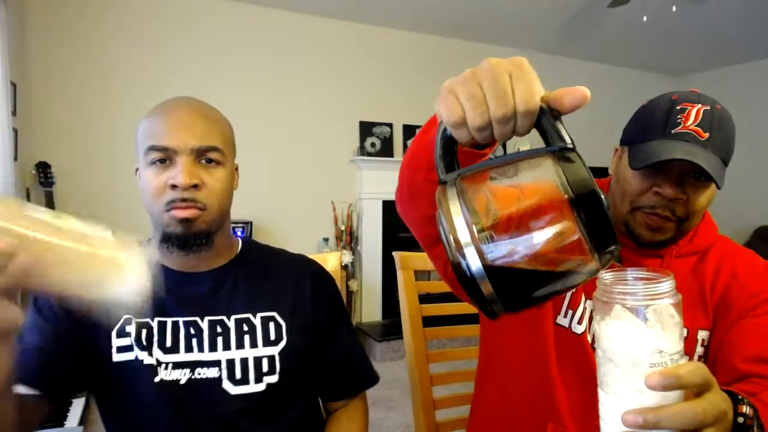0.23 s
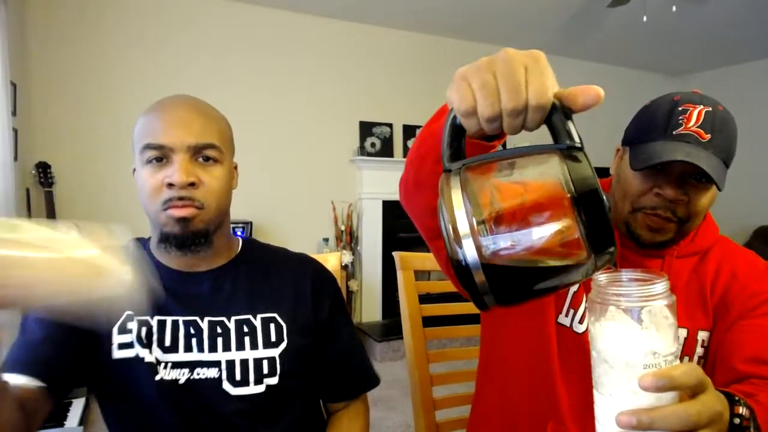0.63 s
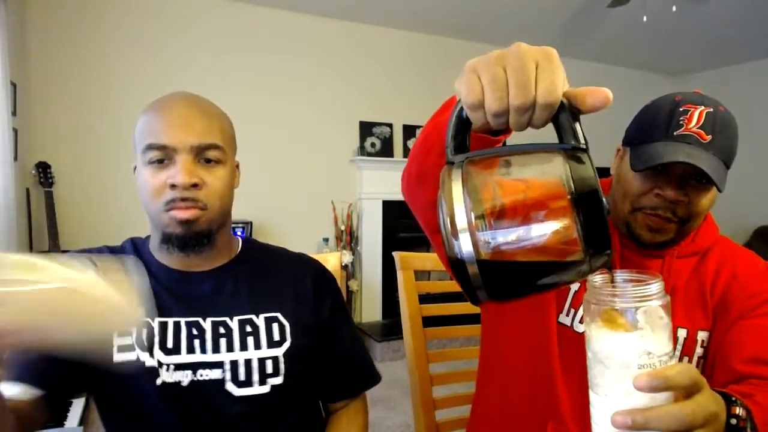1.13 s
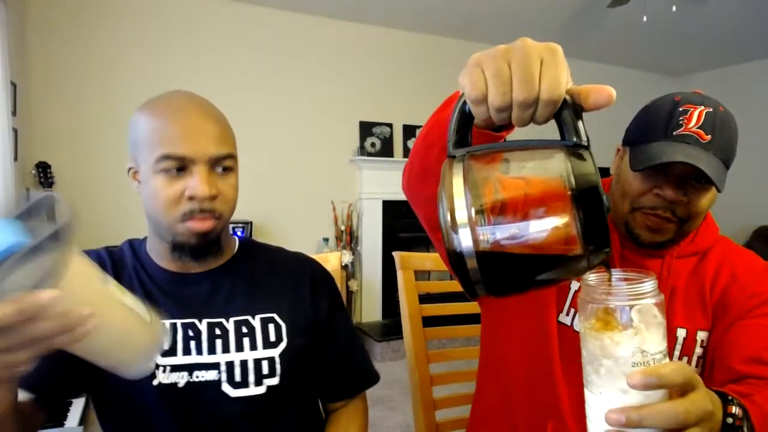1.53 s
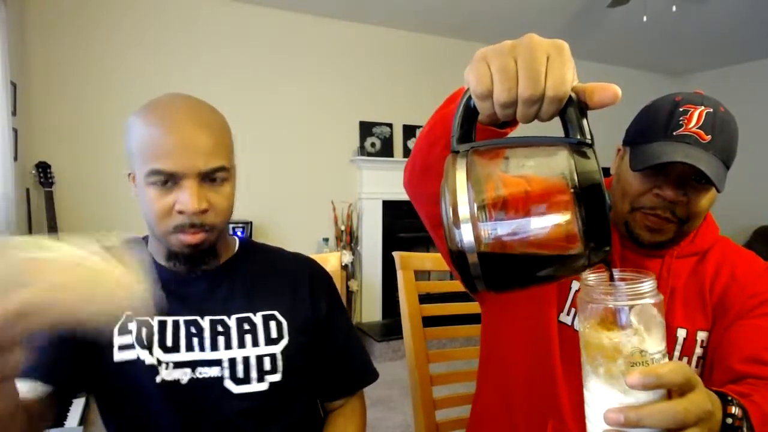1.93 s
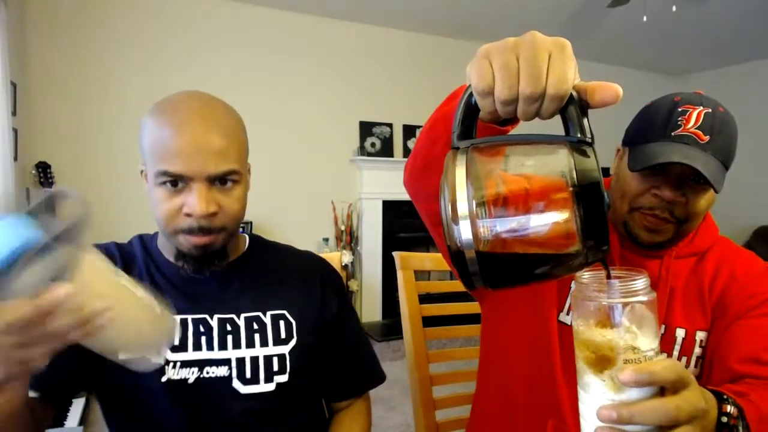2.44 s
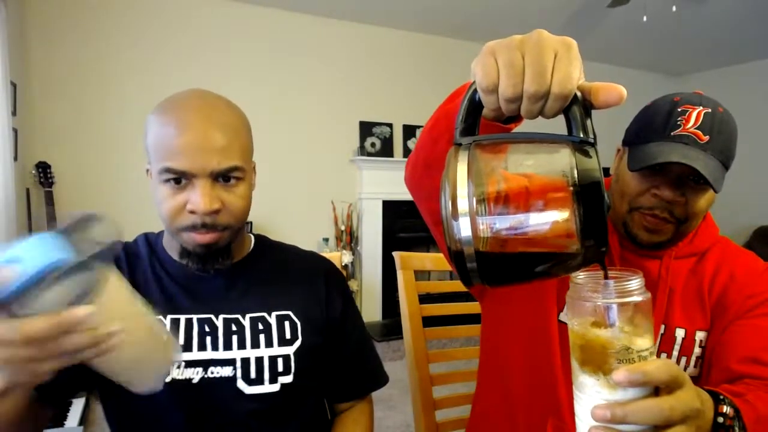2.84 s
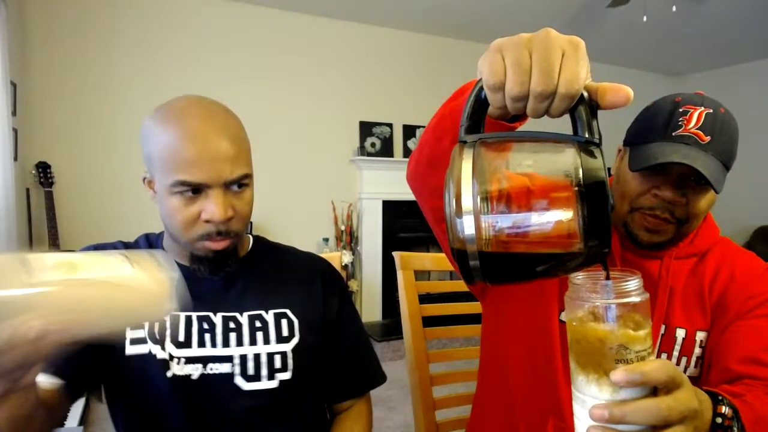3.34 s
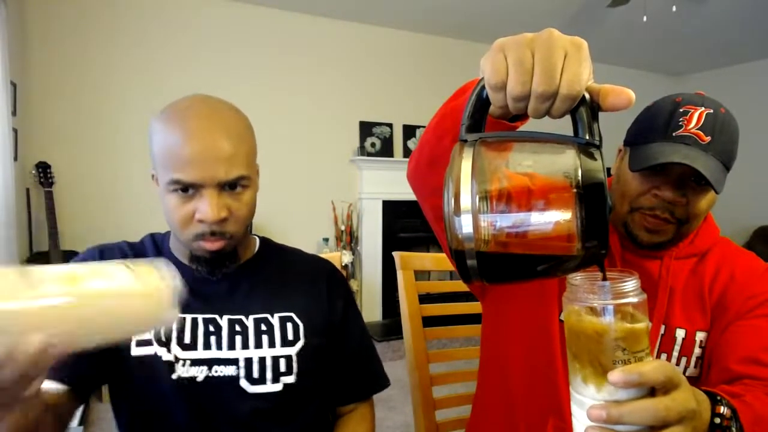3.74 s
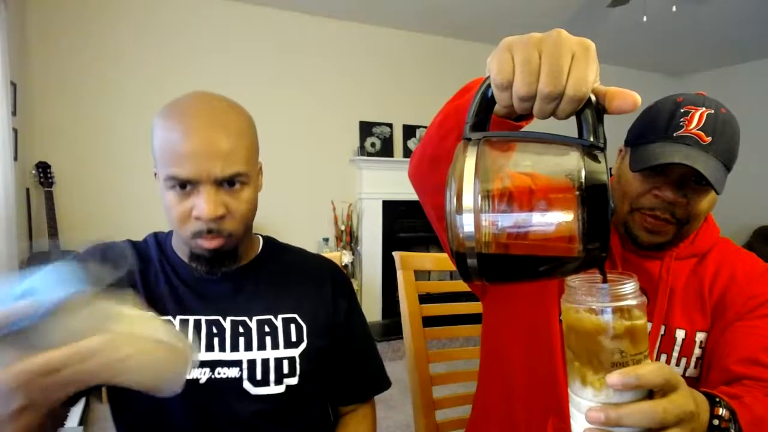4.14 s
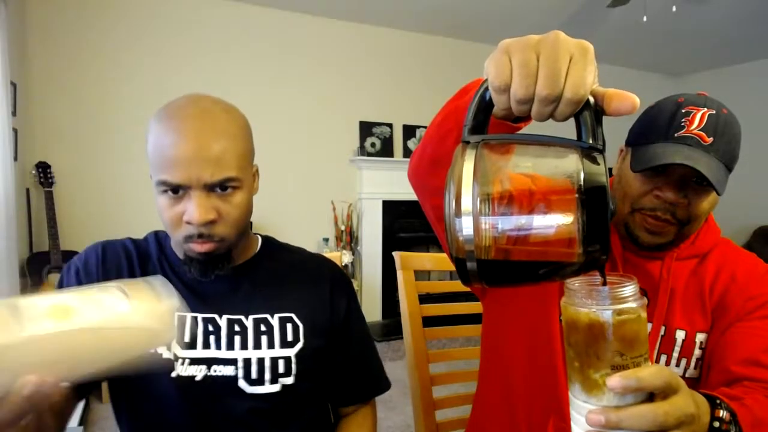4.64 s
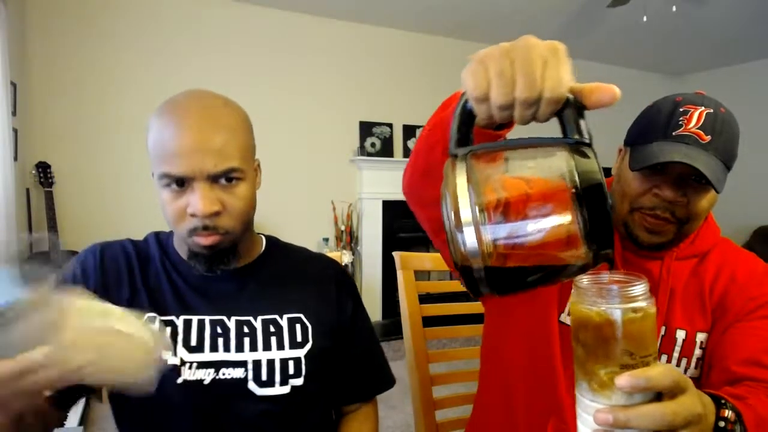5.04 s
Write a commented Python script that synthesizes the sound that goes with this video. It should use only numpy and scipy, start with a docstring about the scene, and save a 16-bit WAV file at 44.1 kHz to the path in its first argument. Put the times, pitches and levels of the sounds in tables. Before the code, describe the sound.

In a carpeted living room, an iced drink swings in a plastic shaker close to the microphones and slightly left. Dense ice rattles, hollow knocks, gurgles and spray start at once, strongest in the first second, then become lighter and more separated. Within the first second a thin coffee trickle over ice in a glass jar fades in farther off, with bubbly tones, soft crackle, sharp snaps and small gulps of air. A faint low hum lies underneath.

```python
"""A carpeted living room, two close-set microphones: a faint low hum, with two soft bumps, lies under it all.
From the start an iced drink is swung in a plastic shaker bottle, close by and to the left: grains and bubbles
rung through the bottle's modes slosh, gurgle and spray, and struck modes give the knocks of ice cubes. Within
the first second a thin trickle of coffee over ice in a glass jar fades up further off, as rising bubble tones
and soft crackle. Towards its end, sharp snaps of ice and gulps of air begin and go on among the swings."""
import sys
import numpy as np
from scipy import signal
from scipy.fft import rfft, irfft
from scipy.io import wavfile
from scipy.ndimage import uniform_filter1d

SR = 44100
rng = np.random.default_rng(int(sys.argv[2]) if len(sys.argv) > 2 else 0)


def transcribe(u):
    """Save the signal u as a 16-bit wav file named by the first command-line argument.

    u: samples, shape (n,) or (channels, n), limited to [-1, 1]; the rate is SR.
    q: integer samples, one column per channel.
    """
    v = np.clip(np.atleast_2d(u).T, -1, 1)
    q = np.round(v * 32767).astype(np.int16)
    wavfile.write(sys.argv[1], SR, q)


N = 233097
TIME = np.arange(N) / SR

# resonances of the bottle's base, air space and wall: f/Hz, relative level/dB, t60/s (before any damping by a cube)
BASE_MODES = [(367, -13, 0.11), (413.5, -8, 0.13), (515, 0.5, 0.058), (611, 2, 0.12)]
CAVITY_MODES = [(824, -8.5, 0.0067), (910, 0, 0.029), (1068, -3.5, 0.03), (1420, -19.5, 0.039)]
WALL_MODES = [(1554, -4.5, 0.022), (1802, -1.5, 0.036), (1980, 2, 0.018), (2225, -2, 0.074),
              (2580, 14, 0.0044), (2660, -32, 0.011), (3070, -6, 0.058), (3470, 0.5, 0.012),
              (4240, 4, 0.0053)]
# spectrum of a hard ice contact: f/Hz, relative level/dB
TICK_COLOUR = [(1500, -36.5), (3000, 6.5), (4000, 2), (5300, 0.5), (6900, -0.5), (7600, -8.5), (9800, -9),
               (12000, -15.5), (16000, -40)]
# spectrum of fine splashes and of crackling ice: f/Hz, relative level/dB
SPRAY_COLOUR = [(1500, -31), (3000, 2), (4000, 1), (5300, -4.5), (6800, -10), (10000, -10.5), (13000, -19),
                (16000, -52)]

# the wall's two singing resonances; where the drink lies decides which one leads
UPPER_HZ, LOWER_HZ = 2486, 1927
CHATTER_S = 0.006  # decay of a cube's chatter on the wall, and of the crumbling of a tick


def undb(db):
    """Decibels to gain."""
    return 10 ** (np.asarray(db) / 20)


def unit(x):
    """Scale to rms 1."""
    return x / np.sqrt(np.mean(x ** 2) + 1e-18)


def curves(table):
    """The columns of a table, joined by straight lines in time."""
    s, *columns = np.transpose(table)
    return [np.interp(TIME, s, c) for c in columns]


def add(track, s, sound):
    """Mix a sound into a track at time s, or at the start if s is negative."""
    i = max(int(s * SR), 0)
    part = sound[:max(N - i, 0)]
    track[i:i + len(part)] += part


def through(x, response):
    """Pass a signal through an impulse response."""
    return signal.fftconvolve(x, response)[:len(x)]


def lowpass(x, hz, order):
    """Butterworth filter that keeps what lies below hz."""
    return signal.sosfilt(signal.butter(order, hz, fs=SR, output="sos"), x)


def highpass(x, hz, order):
    """Butterworth filter that keeps what lies above hz."""
    return signal.sosfilt(signal.butter(order, hz, "high", fs=SR, output="sos"), x)


def bandpass(x, low_hz, high_hz, order):
    """Butterworth filter that keeps what lies between two frequencies."""
    return signal.sosfilt(signal.butter(order, [low_hz, high_hz], "band", fs=SR, output="sos"), x)


def band(low_hz, high_hz, order=3):
    """Impulse response of a broad band without single resonances."""
    return bandpass(signal.unit_impulse(1024), low_hz, high_hz, order)


def colour(points, size=512):
    """Causal (minimum-phase) impulse response with a spectrum of (Hz, dB) points."""
    hz, db = np.transpose(points)
    f = np.maximum(np.fft.rfftfreq(size, 1 / SR), 1)
    level_db = np.interp(np.log(f), np.log(hz), db)
    cepstrum = irfft(np.log(undb(level_db)))
    cepstrum[1:size // 2] *= 2
    cepstrum[size // 2 + 1:] = 0
    return irfft(np.exp(rfft(cepstrum)))


def clicks(rate, spread_db, size=N):
    """Random impulses, rate per second, many small and a few large."""
    chance, weight, sign = rng.random((3, size))
    gain = undb(spread_db * np.minimum(-np.log(weight + 1e-12), 3.5))
    return (chance < rate / SR) * gain * np.sign(sign - 0.5)


def steady(x):
    """Even out the slow level of a grain stream, leaving its grain."""
    window = int(0.04 * SR)
    power = uniform_filter1d(uniform_filter1d(x ** 2, window), window)
    return x / np.sqrt(np.abs(power) + 1e-3 * np.mean(x ** 2))


def flicker(rate):
    """Random levels, rate per second, joined by straight slews; spread near 1.3."""
    k = int(SR / rate)
    held = np.repeat(rng.standard_normal(N // k + 1), k)
    return 1.63 * uniform_filter1d(held, k)[:N]


def ring(modes, detune=0.025, spot_db=7.0, size=4096):
    """One blow's response: the liquid's load detunes the modes, the spot that is hit weights them."""
    hz, db, t60 = np.transpose(modes)[:, :, None]
    t = np.arange(size) / SR
    load, spot, polarity = rng.standard_normal((3, len(hz), 1))
    envelope = np.sign(polarity) * undb(db + spot_db * spot - 60 * t / t60)
    wave = (envelope * np.sin(2 * np.pi * hz * (1 + detune * load) * t)).sum(0)
    # the bottle radiates little outside the range of these modes
    return bandpass(wave, 0.87 * hz.min(), 1.07 * hz.max(), order=2)


def bubbles(rate, low_hz, high_hz, cycles, glide, spread_db):
    """Trapped air: short damped tones that rise as they near the surface."""
    out = np.zeros(N)
    for when, pitch, weight in rng.random((int(rate * N / SR), 3)):
        hz = low_hz * (high_hz / low_hz) ** pitch
        age = np.arange(int(cycles * SR / hz) + 2) * hz / (cycles * SR)  # 0 to 1 over the tone
        wave = undb(-50 * age) * np.sin(2 * np.pi * cycles * age * (1 + glide * age / 2))
        gain = undb(spread_db * min(-np.log(weight + 1e-12), 3.5))
        add(out, when * N / SR, gain * wave)
    return unit(out)


def crack(shape, decay_s, size=1024):
    """A tiny fracture or splash: a burst of a millisecond or so, each with its own colour."""
    t = np.arange(size) / SR
    return unit(through(rng.standard_normal(size) * t * np.exp(-t / decay_s), shape))


def room_tone():
    """Low hum of the room, shaped from noise, with a few soft sine bumps."""
    # spectrum of the still room: f/Hz, relative level/dB (per Hz)
    hum_colour = [(20, -13), (36, 2), (47, 1), (62, -1.5), (80, -37), (97, -1), (115, -14), (135, -2),
                  (170, -26), (300, -14), (600, -20.5), (2000, -16.5), (8000, -29), (16000, -44)]
    # soft low bumps in the room: t/s, length/s, f/Hz, rms level/dB
    bump_list = [(2.012, 0.14, 138, -61), (4.63, 0.31, 96.5, -64.5)]
    shape = colour(hum_colour, size=16384)
    mid, side = (unit(through(rng.standard_normal(N), shape)) for _ in range(2))
    out = undb(-61.0) * mid
    for s, length, hz, db in bump_list:
        t = np.arange(int(length * SR)) / SR
        swell = np.sin(np.pi * t / length)
        add(out, s, undb(db) * unit(swell * np.sin(2 * np.pi * hz * t)))
    return out + undb(-74) * np.array([side, -side])


def motion():
    """Sloshes on top of the swirl: gains of rattle, gurgle and spray, and the upper resonance's share."""
    # the drink swirling between sloshes: t/s, rattle level/dB, share of the upper wall resonance (0-1)
    swirl_curve = [(0, -41, 0), (0.85, -44, 0.05), (1.3, -44, 0.4), (1.6, -47.5, 0.2), (2.05, -47, 0.4),
                   (2.53, -50, 0.5), (2.8, -48, 0.6), (3.3, -45, 0.9), (3.6, -50.5, 0.43),
                   (4.45, -52, 0.36), (5.29, -51, 0.57)]
    # the drink thrown at the wall: t/s, length/s, ice rattle level/dB, gurgle level/dB, spray level/dB,
    # share of the upper wall resonance (0-1); levels are relative, before the mix
    slosh_list = [(-0.01, 0.049, -22, -36, -34, 0.42), (0.136, 0.056, -30, -50, -38, 1),
                  (0.245, 0.047, -43, -43, -46.5, 0), (0.389, 0.15, -27.5, -36, -34, 0.45),
                  (0.543, 0.2, -28.5, -37, -39, 0.33), (0.769, 0.098, -36.5, -48, -41, 1),
                  (0.894, 0.088, -38.5, -46.5, -55, 0), (1.013, 0.073, -29.5, -39.5, -48, 0.98),
                  (1.151, 0.044, -37, -64, -73, 0.1), (1.39, 0.1, -40.5, -41.5, -44, 0),
                  (1.661, 0.062, -41.5, -63, -47.5, 1), (1.763, 0.04, -40, -51, -44, 0.9),
                  (1.865, 0.067, -47, -39, -47.5, .4), (2.175, 0.058, -40.5, -38.5, -43, 0.8),
                  (2.271, 0.013, -41, -46, -43.5, 0.05), (2.411, 0.039, -44.5, -51, -48.5, 0.3),
                  (2.603, 0.045, -40, -66, -43.5, 1), (2.662, 0.034, -34.5, -47, -45, 0.9),
                  (2.72, 0.039, -31, -47, -42, 0.67), (2.85, 0.099, -49.5, -54, -44.5, 0.9),
                  (3.039, 0.069, -41.5, -42, -39, 0.45), (3.108, 0.095, -40.5, -56, -60, 0.22),
                  (3.188, 0.046, -63, -43, -43, .5), (3.421, 0.053, -44, -67, -64, 0.9),
                  (3.654, 0.022, -48, -34, -36.5, 0), (3.808, 0.03, -58, -74, -36, 0.9),
                  (3.901, 0.02, -42, -40, -39, 0.95), (3.924, 0.11, -47, -70, -49.5, 1),
                  (4.052, 0.035, -68, -65, -41.5, 0.4), (4.382, 0.045, -37.5, -68, -40, 0.98),
                  (4.56, 0.042, -38.5, -53, -41, 1), (4.882, 0.016, -42.5, -65, -41, 0.94),
                  (5.029, 0.048, -53, -44, -46.5, 0), (5.213, 0.028, -49, -47, -49, 0.8)]
    # each slosh swells, sags while it lasts and drains away
    attack_s, sag_db_per_s, drain_db_per_s = 0.0099, 8.5, 381
    gurgle_offset_db, spray_offset_db = -2, -5.5  # swirl's gurgle and spray relative to its rattle

    swirl_db, swirl_share = curves(swirl_curve)
    power = undb(swirl_db + np.array([[0], [gurgle_offset_db], [spray_offset_db]])) ** 2
    upper_power = swirl_share * power[0]
    for s, length, rattle_db, gurgle_db, spray_db, share in slosh_list:
        age = np.maximum(TIME - s, 0)
        fall_db = sag_db_per_s * age + drain_db_per_s * np.maximum(age - length, 0)
        envelope = np.minimum(age / attack_s, 1) * undb(-np.minimum(fall_db, 120))
        surge = np.outer(undb([rattle_db, gurgle_db, spray_db]), envelope) ** 2
        power = power + surge
        upper_power = upper_power + share * surge[0]
    return *np.sqrt(power), np.clip(upper_power / power[0], 0, 1)


def rattle(modes, rate, spread_db, count=24):
    """Small collisions at many spots of the bottle, each spot ringing the modes differently."""
    spots = (through(clicks(rate / count, spread_db), unit(ring(modes, detune=0.065))) for _ in range(count))
    return steady(sum(spots))


def singing_wall(hz, t60, wander, vigour):
    """Light touches keep one resonance of the wall ringing while the moving drink bends its pitch."""
    turn = np.exp(2j * np.pi * np.cumsum(hz * (1 + wander * flicker(25))) / SR)
    touches = clicks(220 * vigour, 3.6)
    # a decaying ring, computed in a frame that turns with the wandering pitch
    swing = signal.lfilter([1], [1, -undb(-60 / (t60 * SR))], touches / turn)
    return steady(bandpass((swing * turn).imag, 1300, 3600, order=2))


def gurgle_sound(vigour):
    """The air space and the base ring under many small blows, among low bubbles."""
    # the air space is strongest early on, the base gains on it later
    hollow_db = np.interp(TIME, [0.8, 3.3, 4.6], [2.0, 1.2, -1.5])
    air = undb(hollow_db - 0.5) * rattle(CAVITY_MODES, 170 * vigour, 1.8)
    base = undb(-hollow_db - 6.0) * rattle(BASE_MODES, 110 * vigour, 6.8)
    return air + base + undb(-4) * bubbles(90, 380, 1700, 10, 0.2, 4.5)


def wall_wash(upper, vigour):
    """Slivers of ice wash along the singing wall; hard churning buries its resonances under collisions."""
    # in the hardest slosh this share of the power is slivers of ice hitting each other
    churn_share = 0.42
    singing = np.sqrt(upper) * singing_wall(UPPER_HZ, 0.0068, 0.035, vigour)
    singing += np.sqrt(1 - upper) * singing_wall(LOWER_HZ, 0.02, 0.015, vigour)
    # the singing stands out and gives the wash its hollow colour
    wall = undb(-0.5) * singing + undb(-7) * rattle(WALL_MODES, 330 * vigour, 3.4)
    wall += undb(-7.5) * steady(bubbles(300, 1400, 3400, 13, 0.12, 4.0))
    churn = np.clip(churn_share * (vigour - 1) / (vigour.max() - 1), 0, 1)
    collisions = steady(through(clicks(4200, 3.2), band(1420, 6180, order=5)))
    return np.sqrt(1 - churn) * wall + np.sqrt(churn) * collisions


def spray_sound(vigour):
    """Fine splashes and fizzing bubbles; a hard slosh throws heavier drops, whose spray is duller."""
    heavy_spray_hz = 9200
    shape = colour(SPRAY_COLOUR)
    splashes = sum(through(clicks(12 * vigour ** 1.8, 5.2), crack(shape, 0.0002)) for _ in range(30))
    fizz = steady(bubbles(1100, 2900, 6800, 12, 0.08, 4.0))
    spray = undb(-0.5) * steady(splashes) + undb(-4) * fizz
    heavy = lowpass(spray, heavy_spray_hz, order=3)
    return spray / vigour + heavy * (1 - 1 / vigour)


def slosh(rattle_gain, gurgle_gain, spray_gain, upper):
    """The drink washes ice along the wall, gulps air and sprays; the harder it moves, the denser the grains."""
    vigour = np.clip(np.maximum(rattle_gain, 2 * spray_gain) / undb(-43.0), 1, 8)
    low = undb(-8.5) * gurgle_gain * gurgle_sound(vigour) + gulps()
    # a gentle wash arrives in clumps, a hard one is more even
    clumps_db = 2.0 * flicker(60) / np.sqrt(vigour)
    bright = rattle_gain * wall_wash(upper, vigour) + spray_gain * spray_sound(vigour)
    return low, undb(clumps_db) * bright


def blow(response, chatter, chatter_s, size=4096):
    """A first contact followed by dying chatter of the cube; rms 1 over the first 10 ms."""
    t = np.arange(size) / SR
    force = chatter * clicks(1500, 0.67, size=size) * np.exp(-t / chatter_s)
    force[0] = 1
    sound = through(force, response)
    return sound / np.sqrt(np.mean(sound[:SR // 100] ** 2))


def contact(size):
    """One clean touch: a very short burst that holds every frequency about equally."""
    contact_s = 0.00076
    burst = rng.standard_normal(size) * np.exp(-np.arange(size) / (SR * contact_s))
    # keep the burst's phases and level its spectrum
    even = irfft(np.exp(1j * np.angle(rfft(burst, 2 * size))))[:size]
    return even * np.sqrt(SR * contact_s / 2)


def crunch(shape, crumble, decay_s, size=4096):
    """Ice crushed at the contact: a sharp crack, then a dying spray of fractures; rms 1 over 10 ms."""
    t = np.arange(size) / SR
    fractures = unit(clicks(7000, 1.6, size=size)) * np.exp(-t / decay_s)
    sound = through(contact(size) + crumble * fractures, shape)
    return sound / np.sqrt(np.mean(sound[:SR // 100] ** 2))


def clink(hz, lead_db, t60=0.018, edge=0.63):
    """The wall struck by a cube: one resonance leads, and the drink muffles what lies below it."""
    wave = ring(WALL_MODES + [(hz, lead_db, t60)], detune=0.018, spot_db=1.5)
    return highpass(wave, edge * hz, order=3)


def knocks(upper):
    """Ice cubes strike base, air space and wall: returns the low body sound and the bright wall sound."""
    # cubes hitting the bottle: t/s, base thud level/dB, air space level/dB, wall ring level/dB,
    # contact tick level/dB; levels are relative, before the mix
    knock_list = [(0.0167, -35.5, -33, -20, -32), (0.026, -48, -46, -22.5, -36),
                  (0.0407, -42.5, -36, -39, -30), (0.1373, -61, -41, -27, -43.5),
                  (0.1432, -65, -38, -20, -51), (0.1847, -62, -57, -34, -39.5),
                  (0.302, -74, -50, -32.5, -56), (0.355, -69, -50, -29, -59),
                  (0.383, -39, -29.5, -16.5, -28.5), (0.3897, -69, -61, -21.5, -28),
                  (0.4002, -56, -60, -26, -31), (0.4766, -65, -32.5, -26.5, -32),
                  (0.586, -37.5, -42, -38, -32), (0.6005, -40, -41, -31, -35.5),
                  (0.6703, -38.5, -31, -29, -39), (0.733, -73, -62, -22.5, -32),
                  (0.763, -74, -39, -24.5, -34.5), (0.8387, -67, -46, -28.5, -38.5),
                  (0.9772, -71, -65, -29.5, -56), (1.016, -37.5, -47, -37, -49),
                  (1.0448, -41, -45, -31, -38), (1.058, -56, -34.5, -29.5, -40),
                  (1.206, -70, -64, -35.5, -68), (1.406, -48, -47, -34, -66), (1.442, -57, -39, -33, -54),
                  (1.4934, -61, -33, -37.5, -52), (1.7602, -33, -29.5, -26, -46.5),
                  (1.77, -50, -35, -28.5, -38.5), (1.9911, -78, -65, -20.5, -26.5),
                  (1.9954, -51, -56, -23, -36), (2.167, -33, -50, -49, -41.5),
                  (2.2138, -36, -26.5, -34, -31), (2.2228, -59, -50, -37, -61),
                  (2.3706, -46, -54, -41, -39.5), (2.713, -42, -35, -33, -40), (2.7202, -40, -40, -23, -27),
                  (2.7509, -37, -33, -28, -41), (2.833, -36, -42, -32.5, -45), (2.9135, -53, -35, -44, -39),
                  (3.1216, -64, -37, -33, -38), (3.129, -75, -25, -29, -46), (3.1437, -66, -31, -23.5, -39),
                  (3.1701, -40, -34, -32, -44), (3.3517, -80, -41.5, -39, -40.5),
                  (3.414, -67, -42.5, -32, -46.5), (3.4262, -69, -42, -35.5, -52),
                  (3.4762, -76, -75, -32.5, -61), (3.4926, -72, -67, -32, -44),
                  (3.6662, -38, -42.5, -41, -42), (3.688, -75, -49, -34.5, -35.5),
                  (3.761, -69, -67, -43, -43.5), (3.818, -66, -70, -41, -43),
                  (3.8292, -70, -72, -40, -42.5), (3.9449, -46, -67, -37.5, -42.5),
                  (3.965, -71, -48, -27.5, -57), (4.009, -71, -70, -37, -57), (4.0215, -59, -76, -30, -52),
                  (4.1357, -50, -46, -23.5, -28.5), (4.2371, -64, -49, -29.5, -48.5),
                  (4.2897, -45, -40, -45.5, -43.5), (4.3623, -77, -49, -38, -49.5),
                  (4.4005, -53, -43, -40, -44), (4.404, -59, -62, -29.5, -40.5),
                  (4.517, -65, -62, -39.5, -34.5), (4.5718, -43, -66, -24, -55),
                  (4.585, -44, -76, -28, -38), (4.716, -46, -61, -35, -64), (4.84, -21.5, -24.5, -35, -26),
                  (4.849, -42, -45, -29, -39), (5.0584, -46, -39, -42, -42.5)]
    # a wet cube rings the leading resonance more purely than a dry one:
    # ring over tick/dB, level of the leading mode/dB
    purity_curve = [(5, 10.5), (22, 17)]
    base_damping = 2.1  # a cube resting on the base shortens its ring by this factor
    # a cube above the drink ticks more than it rings, and its tick is brighter:
    dry_tilt, treble_hz = 0.45, 6360  # dB per octave above treble_hz, for each dB of tick over ring
    # a blow also shakes many weak, quickly damped modes, which fill the gaps between the strong ones
    wall_crunch_db, body_crunch_db, crunch_s = -4, -7, 0.0075

    low, bright = np.zeros(N), np.zeros(N)
    base = [(hz, db, t60 / base_damping) for hz, db, t60 in BASE_MODES]
    body_shape, wall_shape = band(350, 1220), band(1750, 3200)
    for s, base_db, cavity_db, wall_db, tick_db in knock_list:
        wetness_db = wall_db - tick_db
        lead_hz = UPPER_HZ if np.interp(s + 0.01, TIME, upper) > 0.36 else LOWER_HZ
        wall = clink(lead_hz, lead_db=np.interp(wetness_db, *np.transpose(purity_curve)))
        tilt = dry_tilt * np.clip(-wetness_db, -10, 20)
        tilted = [(hz, db + tilt * np.log2(max(hz / treble_hz, 1))) for hz, db in TICK_COLOUR]
        tick = colour(tilted, size=1024)
        # a hard blow crumbles less than a light one; a wet cube crunches less than a dry one
        crumble = np.interp(tick_db, [-40, -28], [0.27, 0.17])
        dryness = np.interp(wetness_db, [9, 22], [1, 0.35])
        body_db = (base_db + cavity_db) / 2 + body_crunch_db
        add(low, s - 0.0005, undb(base_db - 5.0) * blow(ring(base), 0.036, 0.0034))
        add(low, s - 0.0003, undb(cavity_db - 4.0) * blow(ring(CAVITY_MODES), 0.12, 0.0078))
        add(low, s, undb(body_db) * crunch(body_shape, 0.76, crunch_s))
        add(bright, s, undb(wall_db + 1.97) * blow(wall, 0.67 * crumble, CHATTER_S))
        add(bright, s, dryness * undb(wall_db + wall_crunch_db) * crunch(wall_shape, 0.45, crunch_s))
        add(bright, s, undb(tick_db + 5.5) * crunch(tick, crumble, CHATTER_S))
    return low, bright


def pour():
    """Coffee trickles between the cubes as bubble tones, and the cubes crackle softly down in the jar."""
    # coffee stream: t/s, relative level/dB
    stream_curve = [(0, -91), (1.0, -54), (1.4, -52.5), (2.5, -58.5), (3.3, -60.5), (4.4, -54.5),
                    (5.0, -60.5)]
    crackle_db = -12  # relative to the trickle
    trickle = bubbles(290, 420, 2800, 13, 0.2, 3.6)
    shape = colour(SPRAY_COLOUR)
    crackle = unit(sum(through(clicks(3.5, 4.8), crack(shape, 0.0002)) for _ in range(40)))
    return undb(curves(stream_curve)[0]) * (trickle + undb(crackle_db) * crackle)


def snaps():
    """Ice cracks under strain: only a dry, bright tick is heard, with no ring."""
    # snapping ice: t/s, relative level/dB (before the mix)
    snap_list = [(0.8917, -32.5), (1.0262, -29), (1.2927, -34), (1.37, -34.5), (1.6177, -34.5),
                 (2.362, -29.5), (2.6913, -28.5), (2.8918, -34), (3.055, -29.5), (3.0844, -31),
                 (3.0945, -23), (3.2244, -21), (3.595, -32.5), (3.8494, -33), (4.0875, -29.5),
                 (4.5068, -18), (4.542, -25), (4.78, -35.5), (4.9813, -33)]
    offset_db, crumble = -8.5, 0.12  # level offset; how much a snap crumbles after its first crack
    out = np.zeros(N)
    shape = highpass(colour(TICK_COLOUR), 5200, order=2)
    for s, db in snap_list:
        add(out, s + 0.001, undb(db + offset_db) * crunch(shape, crumble, CHATTER_S))
    return out


def gulps():
    """A large air pocket closes in the drink: it swells, rings briefly and rises a little in pitch."""
    # air pockets: t/s, f/Hz, level/dB (before swell and decay)
    gulp_list = [(0.922, 526, -28.5), (1.275, 724, -35.5), (1.405, 340, -32), (1.52, 1010, -32.5),
                 (1.621, 443, -34.5), (1.712, 600, -30.5), (2.185, 890, -16), (2.795, 437, -30),
                 (2.914, 980, -37), (3.127, 980, -22), (3.716, 475, -34), (3.913, 833, -31),
                 (4.18, 434, -35.5), (4.29, 1950, -24), (4.78, 453, -28), (4.919, 490, -34.5)]
    t60, glide, rise_s = 0.038, 0.06, 0.0012
    out, t = np.zeros(N), np.arange(int(0.08 * SR)) / SR
    for s, hz, db in gulp_list:
        swell = (1 - np.exp(-t / rise_s)) * undb(db - 60 * t / t60)
        add(out, s, swell * np.sin(2 * np.pi * hz * t * (1 + glide * t / (2 * t60))))
    return out


def ports(x, lag_ms, pan_db):
    """Two microphone ports: the right one hears it lag_ms later, the left one pan_db louder."""
    f_khz = np.fft.rfftfreq(2 * N, 1000 / SR)
    late = irfft(rfft(x, 2 * N) * np.exp(-2j * np.pi * f_khz * lag_ms))[:N]
    return np.array([x * undb(pan_db / 2), late * undb(-pan_db / 2)])


def diffuse(size):
    """Dense reflections at two ports, (bass, treble): bass alike at both, midrange partly opposed."""
    noise = rng.standard_normal((4, size))
    side = bandpass(noise[3], 900, 2000, order=2)
    bass = lowpass(noise[2], 750, order=4)
    treble = highpass(noise[:2] + np.array([side, -side]), 750, order=4)
    return bass, treble


def scatter(x, db, bass_db=-3.5, size=1024):
    """Reflections from the table and the hand, which keep changing as the bottle swings."""
    decay_s = 0.003
    t, out = np.arange(size) / SR, np.zeros((2, N))
    fade = undb(db) * unit(np.exp(-t / decay_s) * (t > 0.0004)) / np.sqrt(size)
    starts = np.arange(0, N, size // 2)
    bass, treble = diffuse(len(starts) * size)
    responses = fade * (undb(bass_db) * bass + treble).reshape(2, -1, size)
    # overlapping stretches of sound, each with its own reflections
    padded, crossfade = np.pad(x, (0, size)), signal.windows.cosine(size)
    for track, side in zip(out, responses):
        for i, response in zip(starts, side):
            add(track, i / SR, signal.fftconvolve(padded[i:i + size] * crossfade, response))
    return out


def room(x, wet_db, size=16384):
    """The carpeted room rings briefly, a little longer in the bass."""
    t60_low, t60_high = 0.3, 0.23  # seconds
    t = np.arange(size) / SR
    bass, treble = diffuse(size)
    tails = bass * unit(undb(-60 * t / t60_low)) + treble * unit(undb(-60 * t / t60_high))
    tails = tails * (t > 0.008)
    # soft furnishings swallow the highest treble
    tails = lowpass(tails, 6000, order=1)
    return undb(wet_db) * np.array([through(x, h / np.sqrt(size)) for h in tails])


def scene():
    """The bottle near and to the left, its low sound a little louder at the right port; the jar to the right."""
    bottle_low_hz = 221  # the bottle is too small to radiate much below this
    rattle_gain, gurgle_gain, spray_gain, upper = motion()
    bottle = np.add(knocks(upper), slosh(rattle_gain, gurgle_gain, spray_gain, upper))
    low, bright = highpass(bottle, bottle_low_hz, order=2)
    bright = bright + snaps()
    coffee = pour()
    direct = ports(low, 0.065, -1.3) + undb(-7.5) * ports(bright, 0.13, 2.5)
    direct = direct + ports(coffee, -0.0076, -3.5)
    reflected = scatter(low + bright, -6.5) + room(low + bright, -13.5) + room(coffee, -5.0)
    return direct + reflected + room_tone()


def record(dry):
    """The recorder cuts the top treble with a steep low-pass filter."""
    top_hz = 16200
    return signal.sosfilt(signal.ellip(8, 0.2, 70, top_hz, fs=SR, output="sos"), dry)


dry = scene()
out = record(dry)
transcribe(out)
```